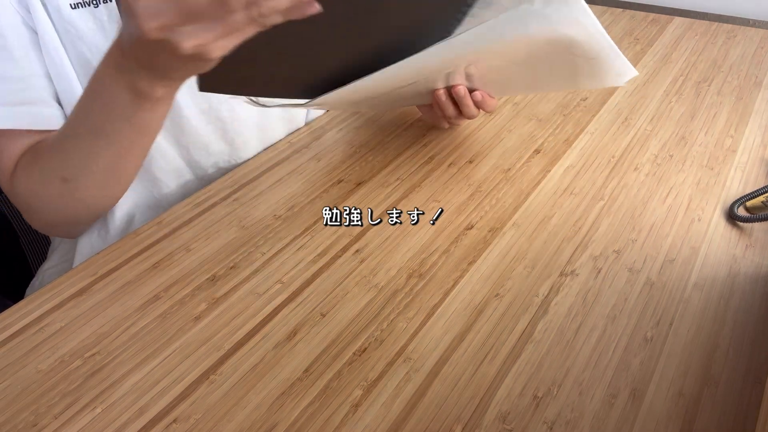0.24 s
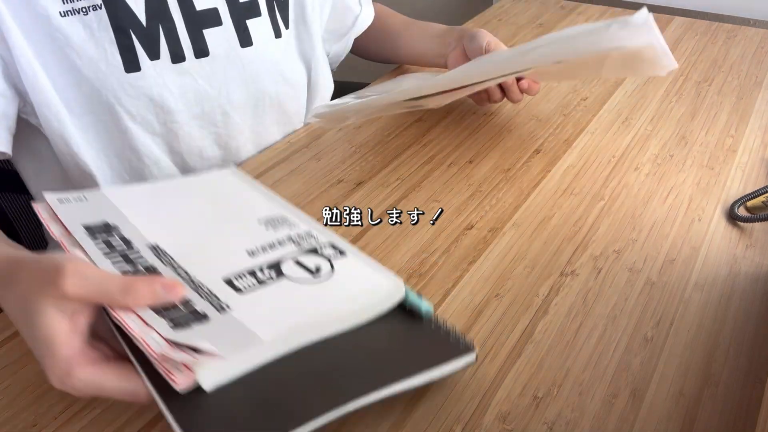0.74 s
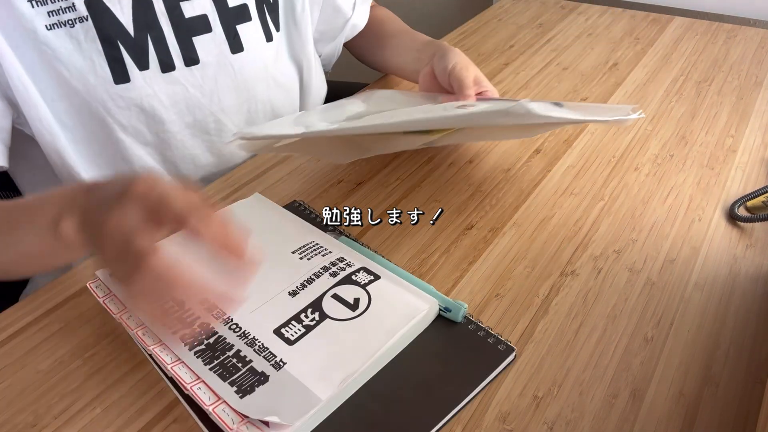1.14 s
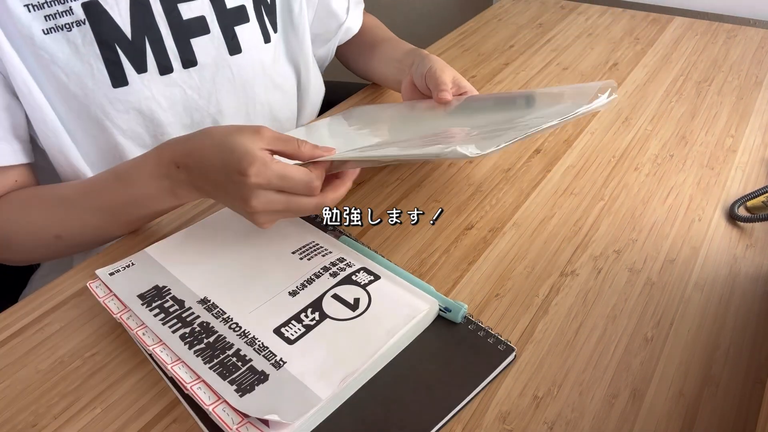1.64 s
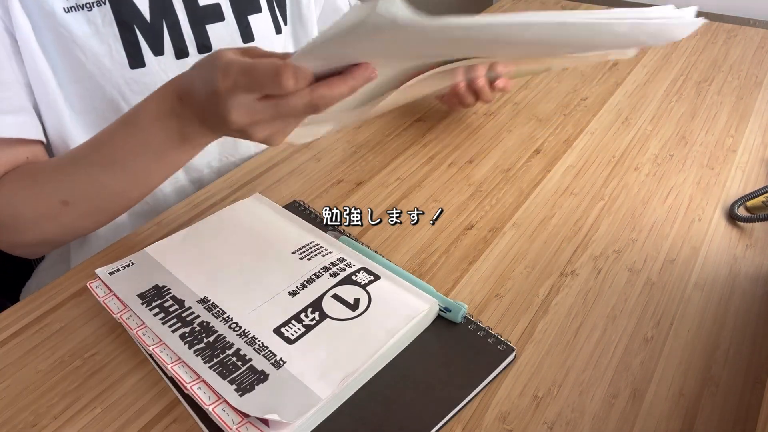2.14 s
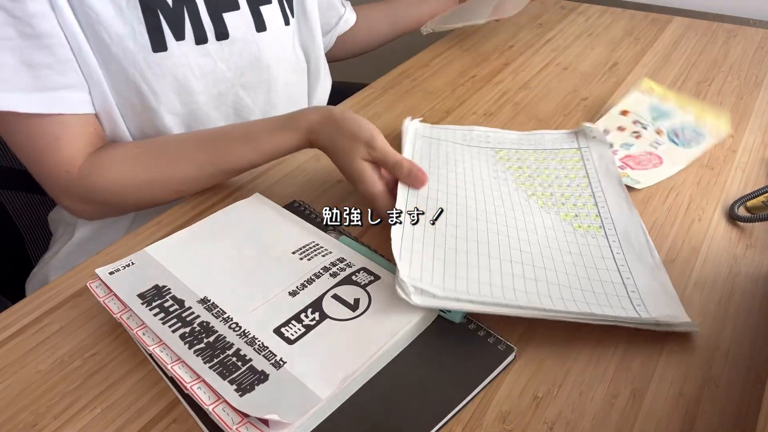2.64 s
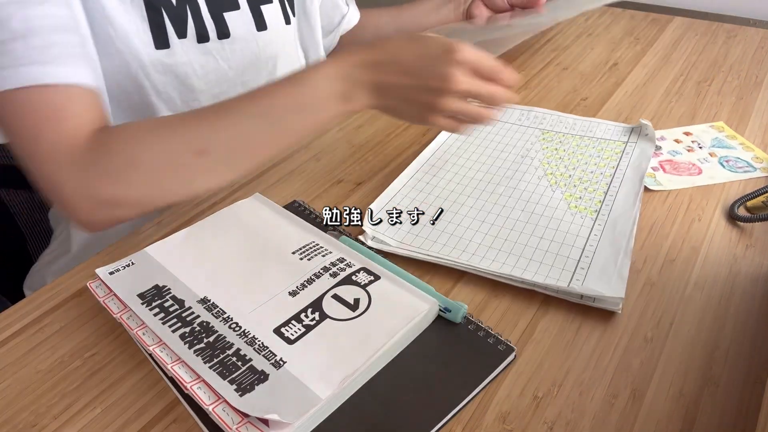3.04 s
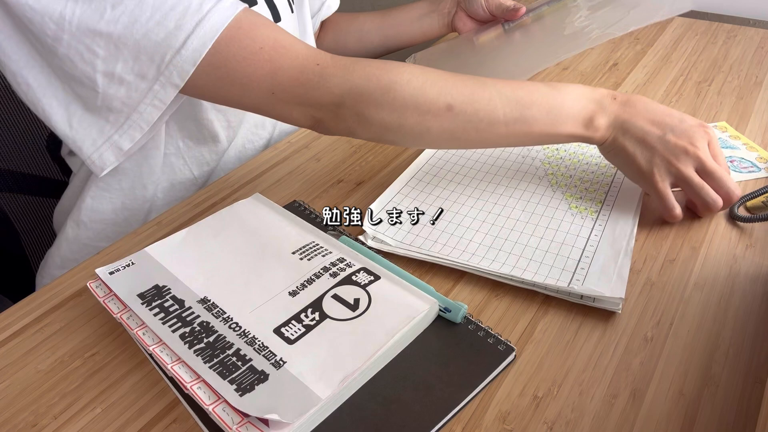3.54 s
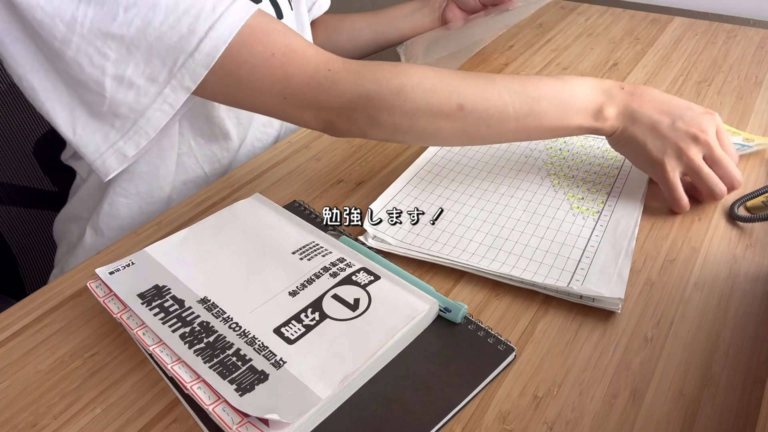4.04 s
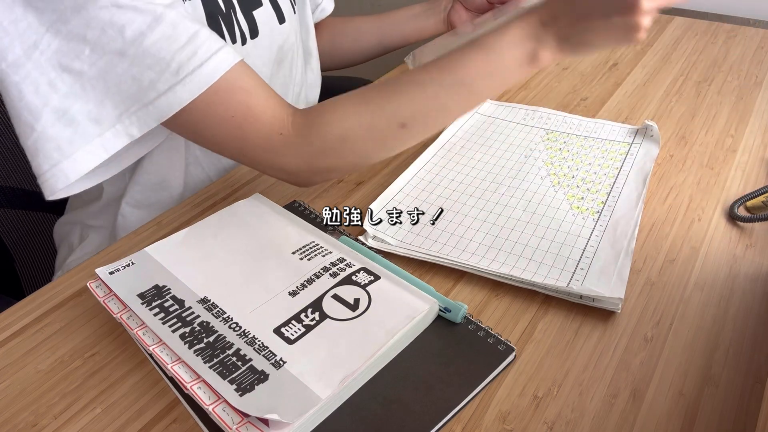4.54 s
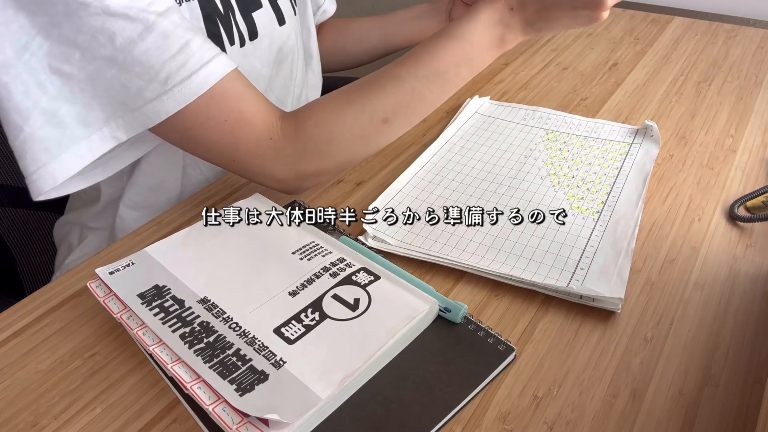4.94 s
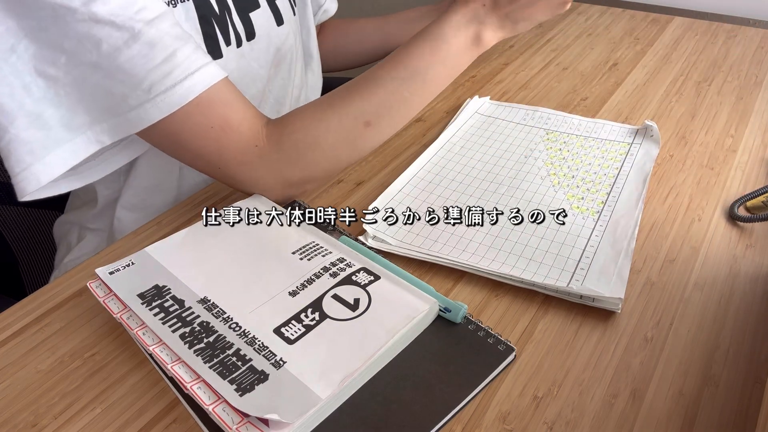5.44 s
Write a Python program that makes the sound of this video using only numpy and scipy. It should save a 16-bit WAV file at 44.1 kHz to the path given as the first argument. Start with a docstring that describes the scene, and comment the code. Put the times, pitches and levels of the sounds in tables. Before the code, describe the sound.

A small, quiet room with a faint low rumble, heard close up in stereo. From 0 s sheets rustle; a bump and plastic snap come at 0.1 s, with smaller bumps and a crackle by 0.45 s. At about 0.77 s books hit the desk with a clattering thud and bright crackle, are pushed briefly over the wood, and drop flat at 1.08 s with the loudest, hard woody knock. From 1.3 to 2.4 s paper slides softly, with little ticks and a smooth hiss swelling near 2 s. A pad lands at 2.6 s with a dull, papery thump and settles. Around 3 to 3.9 s there are only faint fingertip taps and light rustles. Sharp crisp snaps at 4.07 s lead to a short swish at 4.3 s, a tiny click at 4.6 s and soft taps up to 4.9 s. Brighter, raspier sliding peaks at 5.4 s, ending with a light tap and crackle near 5.7 s.

```python
"""A small, quiet room with a wooden desk, heard by a close stereo microphone.
Books are slid off a plastic sleeve and set down; a pad of paper is drawn out and laid beside them.
Sliding sheets hiss, rasp and flutter as random trains of tiny slips; creases tick and stiff plastic
snaps as decaying bursts of noise; hands and books strike as short damped swings with a rattle.
The blows excite the modes of the desk top, and the room adds a diffuse tail and a low rumble."""
import sys
import numpy as np
from scipy import signal
from scipy.fft import rfft, irfft, next_fast_len
from scipy.io import wavfile
from scipy.ndimage import uniform_filter1d, map_coordinates

SR = 44100
rng = np.random.default_rng(int(sys.argv[2]) if len(sys.argv) > 2 else 0)


def store_wav(level_fs):
    """Save 16-bit WAV to argv[1]."""
    pcm = np.round(np.clip(np.atleast_2d(level_fs), -1, 1) * 32767)
    wavfile.write(sys.argv[1], SR, pcm.T.astype(np.int16))


N = 250929
T = np.arange(N) / SR


def undb(db):
    """Amplitude ratio from a level: 20 dB for each factor of ten."""
    return 10 ** (np.asarray(db) / 20)


def unit(x):
    """Normalisation to a root-mean-square amplitude of 1."""
    return x / np.sqrt(np.mean(x ** 2))


def fade(t, t60):
    """Exponential damping: the amplitude is 60 dB down after t60 seconds."""
    return np.exp(-np.log(1000) * t / t60)


def at_hz(points, hz):
    """Linear interpolation of (f/Hz, value) points on a logarithmic frequency axis."""
    f, value = np.transpose(points)
    return np.interp(np.log(hz), np.log(f), value)


def colour(x, points, tilt=0):
    """Spectral shaping by a gain curve, tilted in dB per octave; rms 1."""
    size = next_fast_len(x.shape[-1])
    hz = np.maximum(np.arange(size // 2 + 1) * SR / size, 1)
    gain = undb(at_hz(points, hz) + tilt * np.log2(hz))
    return unit(irfft(rfft(x, size) * gain, size)[..., :x.shape[-1]])


def band(x, lo, hi):
    """Causal band-pass filtering between lo and hi in Hz."""
    sos = signal.butter(2, [lo, min(hi, .45 * SR)], "band", fs=SR, output="sos")
    return signal.sosfilt(sos, x)


def spread(pair, width):
    """Partial coherence: two unrelated signals become middle and side of a stereo pair."""
    side = np.array([[1], [-1]]) * pair[1]
    return (pair[0] + width * side) / np.sqrt(1 + width ** 2)


def pan(db):
    """Interchannel level difference: gains for left minus right in dB."""
    return undb(np.array([[1], [-1]]) * db / 2)


def from_right(x, lag_s):
    """Path difference: sound from the right reaches the left microphone a little later."""
    return np.array([np.interp(T - lag_s, T, x[0]), x[1]])


def walk(rate, size=N):
    """Low-frequency random modulation: smoothed steps, rate per second, spread near 1."""
    hold = int(SR / rate)
    steps = np.repeat(rng.standard_normal(size // hold + 1), hold)
    return unit(uniform_filter1d(steps, hold)[:size])


def add(out, s, sound):
    """Superposition: mix a sound in from time s, in seconds."""
    i = int(s * SR)
    out[:, i:i + sound.shape[-1]] += sound[..., :N - i]


def movement(start, attack, hold, release):
    """Amplitude envelope of a hand movement: linear rise, hold, exponential decay."""
    age = T - start
    return np.clip(age / attack, 0, 1) * fade(np.maximum(age - attack - hold, 0), release)


def air():
    """Stationary background noise: a low, almost steady rumble of the room with a faint hiss."""
    # spectrum of the quiet room: (f/Hz, relative level/dB)
    air_spectrum = [(20, -31.5), (30, -15.5), (40, 1.5), (62, 5.5), (85, 0.5), (140, 2.5), (200, 0),
                    (300, -8), (500, -17.5), (1000, -27), (2000, -35.5), (6000, -53.5), (8000, -36.5),
                    (10500, -53), (15000, -44)]
    noise = spread(colour(rng.standard_normal((2, N)), air_spectrum), width=0.48)
    return undb(-59 + 0.2 * walk(3.5)) * noise * pan(-5.5)


def room(x):
    """Diffuse reverberation: octave bands of noise decay separately, the bass longest."""
    # reverberation time of the room: (f/Hz, t60/s)
    room_decay = [(80, 0.41), (300, 0.19), (1000, 0.22), (4000, 0.22), (14000, 0.12)]
    t, tail = T[:SR // 2], 0
    for hz in 60 * 2. ** np.arange(9):
        octave = band(rng.standard_normal((2, len(t))), hz / np.sqrt(2), hz * np.sqrt(2))
        tail = tail + octave * fade(t, at_hz(room_decay, hz))
    # the first reflections set in between 4 and 6 ms
    tail = spread(tail, width=0.78) * np.clip((t - .004) / 0.002, 0, 1)
    unit_energy = tail / np.sqrt(np.sum(tail ** 2) / 2)
    return signal.fftconvolve(x, unit_energy, axes=1)[:, :N]


def desk(blows):
    """Modal resonance: the blows set damped sinusoidal modes of the wooden top ringing."""
    # modes of the desk top: (f/Hz, relative gain/dB, t60/s)
    desk_modes = [(61, 9, .9), (73, 1, .45), (108, -9, .3), (138, -2, .33), (204, 1, .24), (254, -10, .2),
                  (287, -5, .26), (391, -6, .2), (484, -11, .17), (529, -10, .14), (864, -20, .26),
                  (982, -16, .33)]
    t, ring = T[:SR], 0
    for hz, db, t60 in desk_modes:
        # makes the gain at resonance independent of the damping
        at_peak = 2 * np.log(1000) / (t60 * SR)
        ring = ring + undb(db) * at_peak * fade(t, t60) * np.sin(2 * np.pi * hz * t)
    return undb(6) * signal.fftconvolve(blows, ring[None])[:, :N]


def push():
    """Frictional vibration: the books judder low over the wood as they are pushed."""
    judder = unit(band(rng.standard_normal(N), 55, 173))
    shove = movement(start=.78, attack=0.09, hold=0.13, release=0.19)
    return undb(-57) * judder * shove * pan(-1.0)


def bumps():
    """Impact response: a blow swings a cover or stack briefly, and loose leaves rattle after."""
    # blows in turn: books on the sleeve, their far edge landing, the stack dropping flat,
    # fingers on the pad and its landing, fingertips on desk and sleeve:
    # (t/s, relative level/dB, f/Hz, swell/cycles, relative rattle level/dB)
    blow_list = [ (0.0874, -25, 343, 0.9, -11), (0.2097, -36.5, 970, 0.85, -4), (0.233, -39, 467, 0.92, -6),
                 (.399, -41, 624, 2.2, 7.5), (.712, -55.5, 1110, 0.91, 3.5), (0.766, -38.5, 1310, 2.2, 1.5),
                 (.775, -24, 278, 2, -5.5), (0.7762, -26, 695, 0.63, 1.5), (.787, -26.5, 302, 0.25, -10),
                 (0.7998, -29, 1270, 1, -6.5), (.815, -36, 325, 1.6, -16.5),
                 (1.0754, -11.5, 880, 0.74, -28), (1.0748, -26, 1820, 2.26, -22),
                 (1.077, -21.5, 586, 1.23, -9), (1.0793, -13.5, 215, 0.51, -11),
                 (1.105, -26.5, 117, 0.31, -20), (1.358, -45.5, 444, 1.5, -3), (1.531, -40, 232, 0.51, -22),
                 (1.797, -47.5, 570, 5.1, 12.5), (1.896, -42, 216, 0.56, 2.5), (2.005, -47, 740, 0.52, 4),
                 (2.077, -48, 1020, 0.83, 6), (2.112, -44, 99, 0.93, -24), (2.160, -45, 175, 0.31, -12),
                 (2.595, -27, 324, 0.78, -14), (2.611, -45, 160, 0.3, -8), (3.274, -49, 600, 1.8, 4.5),
                 (3.293, -42, 262, 1.46, 10.5), (3.808, -43.5, 267, 2.3, 4), (4.1139, -42.5, 750, 1.3, -4),
                 (4.1612, -36, 595, 1.3, -5.5), (4.701, -51, 1100, 1, 6), (4.820, -39, 780, 0.66, -6),
                 (4.903, -41.5, 720, 0.85, -0.5), (4.911, -43, 228, 0.21, -1),
                 (5.574, -46, 598, 0.98, -2.5), (5.677, -46.5, 1140, 3.2, 9.5), (5.678, -42, 380, 1.2, 0)]
    out, t = np.zeros((2, N)), T[:SR // 4]
    for s, db, hz, cycles, rattle_db in blow_list:
        age = t * hz / cycles
        swing = age * np.exp(1 - age ** 1.46) * np.sin(2 * np.pi * hz * t)
        noise = band(rng.standard_normal((2, len(t))), hz * 0.39, hz * 1.42)
        leaves = spread(unit(noise), width=0.52)
        # light, high-pitched leaves settle sooner than a heavy stack
        rattle = leaves * fade(t, 0.089 * (500 / hz) ** 0.21) * (1 - np.exp(-age))
        add(out, s, undb(db) * (swing + undb(rattle_db - 3.0) * rattle))
    # small surfaces radiate almost no deep bass
    return band(out, 42.6, 15000) * pan(-4.5)


def snaps():
    """Snap-through: a crease flips with a click in a grainy burst, damped by the sheet."""
    # snaps of stiff plastic and paper edges: (t/s, relative level/dB, t60/s, tilt/dB per octave)
    snap_list = [(0.086, -16.5, 0.015, -1.5), (0.414, -27, 0.023, -0.5), (.456, -31.5, 0.016, 3),
                 (0.57, -55, 0.024, -1), (.612, -57.5, .06, 0), (.724, -55, .05, -3),
                 (.766, -27, 0.095, 5.5), (0.7739, -15.5, 0.04, 5), (0.783, -25.5, 0.096, 3),
                 (0.826, -26.5, .015, 3), (.914, -32.5, 0.017, 2), (1.0743, -25, 0.0097, -2),
                 (1.315, -38.5, 0.066, -1), (1.526, -26.5, 0.014, -4.5), (1.643, -34, 0.021, 3),
                 (2.005, -26.5, 0.012, -6), (2.108, -31, .012, -5), (2.213, -35, 0.012, -6),
                 (2.454, -35.5, 0.089, -7), (2.577, -32, 0.3, -6), (2.613, -23.5, 0.043, -8.5),
                 (2.665, -31.5, 0.056, 0), (2.914, -44.5, 0.068, -5), (3.268, -49, 0.13, -3),
                 (3.866, -45.5, 0.089, -3.5), (4.066, -21, 0.03, 4.5), (4.068, -20, 0.067, 7.5),
                 (4.162, -27, 0.037, 0), (4.588, -26, 0.009, 9.5), (4.701, -43, 0.041, -3.5),
                 (5.214, -43, 0.23, -1), (5.676, -29.5, 0.38, -5)]
    # spectrum of a snap before the tilt: (f/Hz, relative level/dB)
    snap_spectrum = [(40, -82.5), (300, -14.5), (1000, 2), (2500, 3), (4500, 5.5), (7000, -1.5),
                     (9000, -5.5), (15000, -2)]
    out, t = np.zeros((2, N)), T[:SR // 5]
    for s, db, t60, tilt in snap_list:
        force = rng.standard_normal((2, len(t))) * undb(4.9 * walk(500, size=len(t)))
        force[0, 24] += 11  # the click, in the middle of the stereo image
        burst = spread(colour(force, snap_spectrum, tilt), width=1.0)
        onset = 1 - np.exp(-t / 0.0009)
        add(out, s, undb(db - 7.5) * burst * fade(t, t60) * onset)
    return out


def crinkles(activity_db):
    """Local buckling: stray creases tick while the sheets move, each at its own pitch."""
    out, t = np.zeros((2, N)), T[:SR // 50]
    for when, pitch, force, where in rng.random((110, 4)):
        i, hz = int(when * N), 1500 * 6 ** pitch
        tick = unit(band(rng.standard_normal(len(t)), hz / 1.3, hz * 1.3)) * fade(t, .009)
        level_db = min(activity_db[i], -55) - 1.0 + 11.4 * force ** 2
        add(out, T[i], undb(level_db) * tick * pan(10 * (where - .5)))
    return out


def strokes():
    """Forced resonance: a dragged sheet catches unevenly and rings in broad resonances."""
    # dragging strokes: (middle t/s, length/s, relative level/dB, tilt/dB per octave)
    stroke_list = [(0.329, 0.14, -56, 21), (0.78, 0.052, -42, 22), (0.967, 0.28, -53.5, -13),
                   (1.323, 0.025, -47, 3), (2.35, .07, -51, 7), (2.447, 0.14, -51, -18),
                   (2.592, 0.13, -40.5, -13), (2.821, 0.18, -49, -2), (3.752, .13, -55.5, -5),
                   (4.321, 0.071, -47, -1), (4.565, 0.22, -56.5, -0.5), (5.435, .09, -41.5, 9)]
    # broad resonances of a dragged sheet: (f/Hz, relative level/dB)
    sheet_modes = [(1100, -6), (1680, -1), (2170, 2.5), (4300, -7.5)]
    out = np.zeros((2, N))
    for s, length, db, tilt in stroke_list:
        noise = rng.standard_normal((2, SR // 2))
        ring = 0
        for hz, mode_db in sheet_modes:
            mode = unit(band(noise, hz / 1.11, hz * 1.11))
            ring = ring + undb(mode_db + tilt * np.log2(hz)) * mode
        swell = np.hanning(int(length * SR))
        catching = undb(2 * walk(160, size=SR // 2))
        sheet = catching * spread(unit(ring), width=0.3)
        add(out, s - length / 2, undb(db - 2.0) * swell * sheet[:, :len(swell)])
    return out


def friction(points, slips_per_s, scatter_db, catch_db, catch_rate, width):
    """Stick-slip: fibres catch and let go in random impulses whose force wavers in the drag."""
    slips = (rng.random((2, N)) < slips_per_s / SR) * rng.choice([-1, 1], (2, N))
    size = undb(scatter_db * np.minimum(rng.exponential(size=N), 5))
    return spread(colour(slips * size, points), width) * undb(catch_db * walk(catch_rate))


def flexing(x, depth_db, changes_per_s, points_per_octave):
    """Time-varying resonance: a bending sheet changes shape, so its resonances come and go."""
    hz, s, frames = signal.stft(x, SR, nperseg=1024)
    # a smooth random surface; the frequency axis is nearly linear below 500 Hz
    place = np.meshgrid(np.log2(1 + hz / 500) * points_per_octave, s * changes_per_s, indexing="ij")
    shape = map_coordinates(rng.standard_normal((160, 160)), place, mode="mirror")
    return unit(signal.istft(frames * undb(depth_db * shape), SR)[1][:, :N])


def slide_levels():
    """Incoherent addition: overlapping slides add in power; gives hiss, rasp, flutter in dB."""
    # slides of sheet over sheet, one per hand movement: books pulled off the sleeve, pushed along
    # the desk and let go; the pad found, drawn out and laid down; a small sheet picked at, then
    # worked into the sleeve: (t/s, attack/s, hold/s, release t60/s,
    # relative level/dB of the hiss of faces, of the rasp of edges, of the flutter)
    slide_list = [ (0, 0.0007, 0.097, 0.17, -53.5, -52.5, -51), (0.088, .05, 0.047, 0.27, -52, -59, -62),
                  (0.202, 0.011, 0.18, .25, -59.5, -56.5, -58.5),
                  (0.44, 0.015, 0.0063, 0.21, -64, -59.5, -56.5),
                  (0.757, .016, 0.037, 0.39, -55.5, -56.5, -46.5),
                  (0.847, .03, 0.11, 0.19, -66.5, -57, -55), (0.968, 0.072, 0.019, 0.19, -57, -55.5, -54),
                  (1.303, 0.01, 0.03, 0.57, -63, -63, -62), (1.471, .002, 0.032, 0.28, -65, -63, -59),
                  (1.496, 0.029, 0.065, 0.45, -61.5, -59.5, -61),
                  (1.632, 0.0092, .018, 0.24, -57, -58.5, -60),
                  (1.688, 0.053, 0.043, 0.55, -60.5, -57.5, -57.5),
                  (1.83, 0.051, 0.045, .25, -65, -60, -54), (1.922, 0.043, .15, .45, -54, -58, -56.5),
                  (1.988, 0.15, .08, .55, -49, -69, -57.5), (2.228, 0.094, 0.072, 0.12, -49.5, -55, -54),
                  (2.41, 0.067, .16, 0.62, -58, -62, -55), (2.696, 0.13, 0.015, 0.46, -57, -65, -66.5),
                  (3.252, 0.025, 0.029, 0.89, -68, -62, -57),
                  (3.362, 0.046, 0.016, 0.38, -66.5, -72.5, -64),
                  (3.592, 0.0066, 0.17, 0.4, -71.5, -65.5, -60),
                  (3.603, 0.054, 0.0079, 0.25, -56.5, -79, -84), (3.861, .006, 0.015, .17, -60.5, -66, -55),
                  (4.014, 0.065, 0.2, 0.39, -56.5, -66, -66), (4.265, 0.036, 0.049, 0.23, -48, -57, -62),
                  (4.419, 0.072, 0.063, .65, -63.5, -65.5, -66.5),
                  (4.691, .005, 0.043, 0.17, -73, -63, -60.5), (4.777, .003, 0.011, 0.42, -68, -62, -63),
                  (4.885, 0.042, 0.022, 0.85, -69, -69.5, -62.5),
                  (5.005, 0.047, 0.068, 0.42, -62.5, -60, -66),
                  (5.208, 0.0088, 0.015, 0.46, -55.5, -67, -61),
                  (5.315, 0.044, 0.0046, 0.27, -49.5, -53.5, -55.5),
                  (5.385, 0.04, 0.023, 0.27, -46.5, -49.5, -51.5),
                  (5.505, 0.17, 0.055, .3, -55.5, -61.5, -62.5)]
    power = undb(-86.5) ** 2  # held sheets never lie quite still
    for start, attack, hold, release, hiss_db, rasp_db, flutter_db in slide_list:
        peak = undb([hiss_db, rasp_db, flutter_db]) ** 2
        power = power + np.outer(peak, movement(start, attack, hold, release) ** 2)
    return 10 * np.log10(power)


def sliding():
    """Sliding friction: smooth faces hiss, edges rasp, and bending sheets flutter lower down."""
    # spectra of faces, edges and bending sheets: (f/Hz, relative level/dB)
    hiss_spectrum = [(1500, -18), (3000, -4), (4300, 0.5), (6000, 0.5), (7500, -2.5), (9500, -4),
                     (12000, 0.5), (15500, -3)]
    rasp_spectrum = [(600, -14.5), (1200, -4.5), (1650, -2), (1950, -1), (2250, -1), (2700, -2.5),
                     (3500, -3), (6000, -27.5)]
    flutter_spectrum = [(25, -31), (70, 7), (150, -3), (260, -1.5), (400, 2.5), (650, 3), (850, -4.5),
                        (1100, -3.5), (1500, -10.5), (2500, -52)]
    hiss_db, rasp_db, flutter_db = slide_levels()
    hiss = friction(hiss_spectrum, slips_per_s=12000, scatter_db=0.0,
                    catch_db=1.55, catch_rate=81, width=1.0)
    rasp = friction(rasp_spectrum, slips_per_s=3500, scatter_db=0.5,
                    catch_db=2.0, catch_rate=70, width=0.55)
    flutter = friction(flutter_spectrum, slips_per_s=1500, scatter_db=2.5,
                       catch_db=4.0, catch_rate=54, width=0.44)
    hiss = flexing(hiss, depth_db=1.0, changes_per_s=18, points_per_octave=11)
    rasp = flexing(rasp, depth_db=3.5, changes_per_s=14, points_per_octave=11)
    flutter = flexing(flutter, depth_db=3.5, changes_per_s=12, points_per_octave=7.92)
    hiss = hiss * undb(hiss_db + 3.5)
    rasp = rasp * undb(rasp_db + 3.0)
    flutter = flutter * undb(flutter_db + 2.5)
    edges = from_right(rasp + flutter + strokes(), lag_s=0.00016)
    return (hiss + crinkles(hiss_db)) * pan(1.6) + edges * pan(-3)


def scene():
    """Superposition of direct sound, desk resonance, reverberation and background noise."""
    blows = from_right(bumps(), lag_s=.00007) + push()
    paper = sliding() + snaps() * pan(-1.5)
    near = paper + blows + desk(blows)
    return near + undb(-11.5) * room(near) + air()


def record(dry):
    """Mid-side stereo: widest near 7.5 kHz, nearly mono above about 12 kHz; then a low-pass."""
    # stereo width of the microphone pair: (f/Hz, side gain/dB)
    side_gain = [(100, -2.5), (700, 3.5), (2000, -3), (4500, -1.5), (7500, 7), (9300, 3), (11000, 0),
                 (13000, -24)]
    hz = np.maximum(np.arange(N // 2 + 1) * SR / N, 1)
    mid = (dry[0] + dry[1]) / 2
    side = irfft(rfft((dry[0] - dry[1]) / 2) * undb(at_hz(side_gain, hz)), N)
    top_cut = signal.ellip(10, .2, 80, 16000, fs=SR, output="sos")  # cut-off in Hz
    return signal.sosfilt(top_cut, np.array([mid + side, mid - side]))


dry = scene()
out = record(dry)
store_wav(out)
```